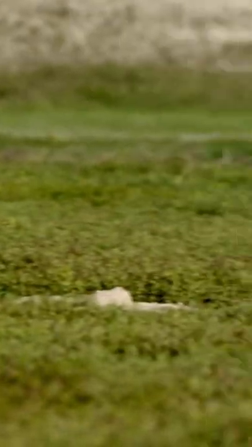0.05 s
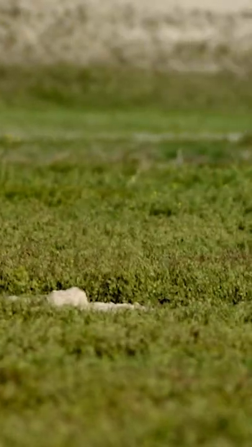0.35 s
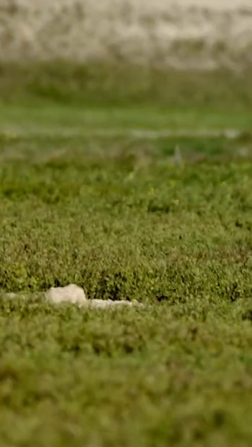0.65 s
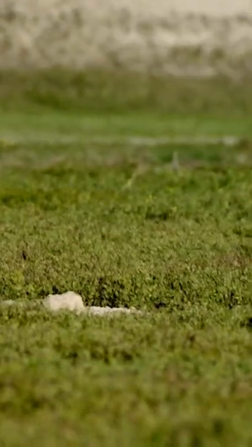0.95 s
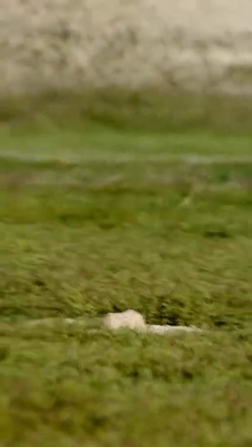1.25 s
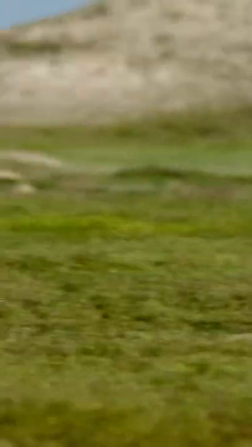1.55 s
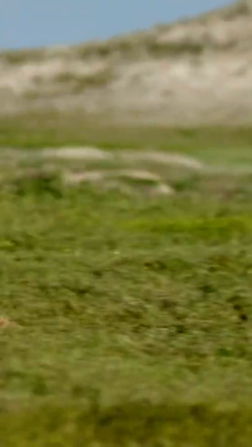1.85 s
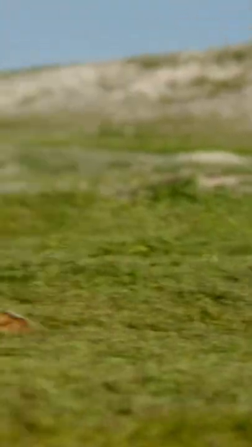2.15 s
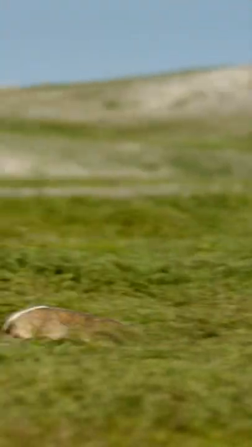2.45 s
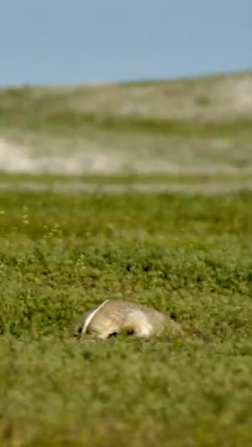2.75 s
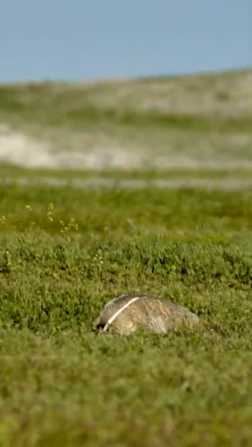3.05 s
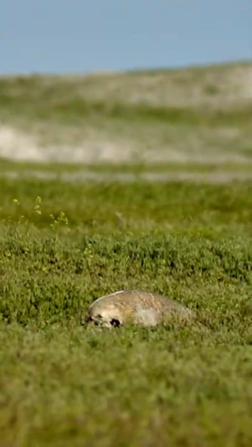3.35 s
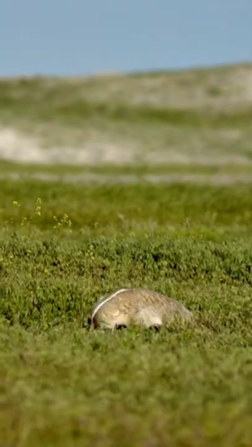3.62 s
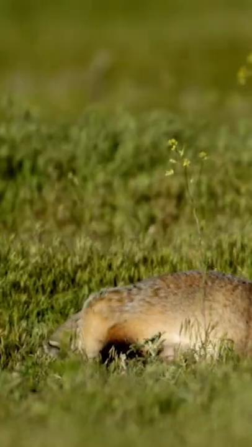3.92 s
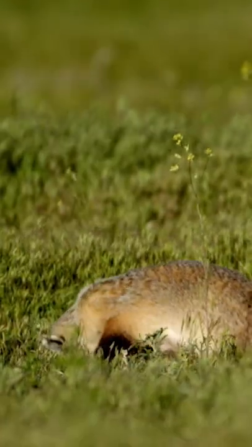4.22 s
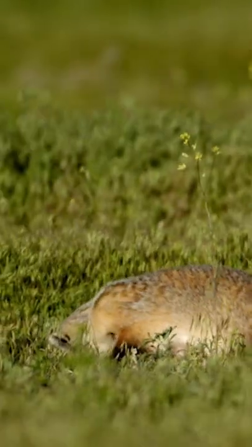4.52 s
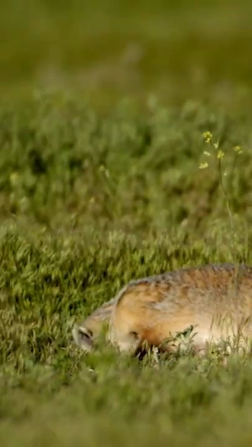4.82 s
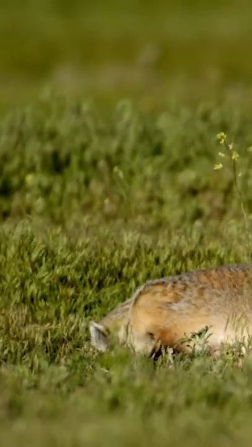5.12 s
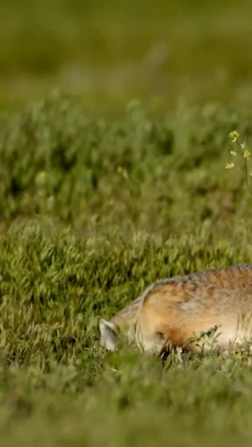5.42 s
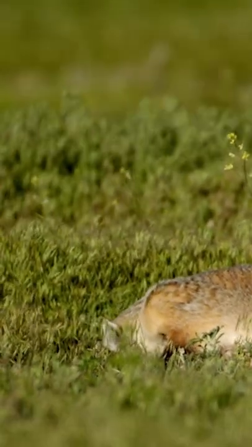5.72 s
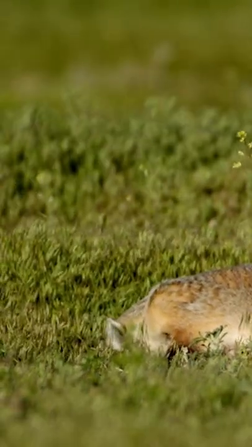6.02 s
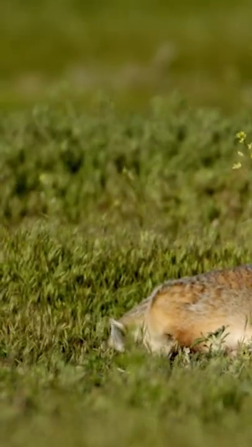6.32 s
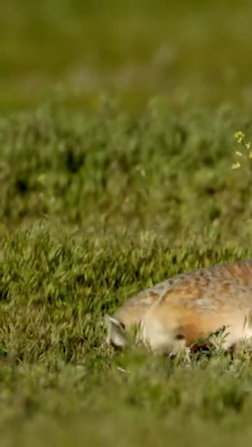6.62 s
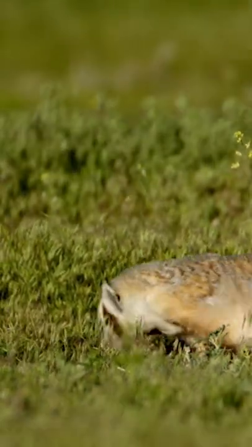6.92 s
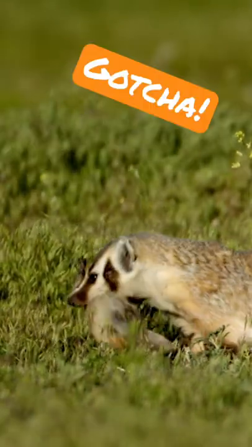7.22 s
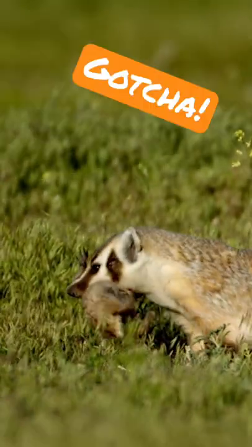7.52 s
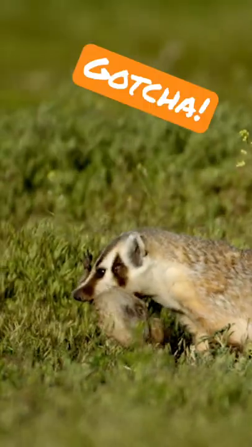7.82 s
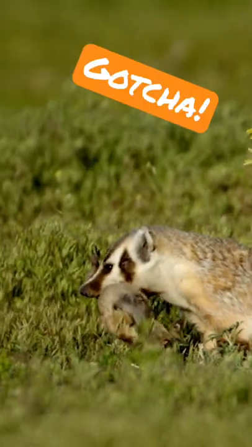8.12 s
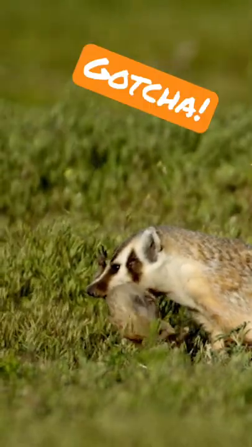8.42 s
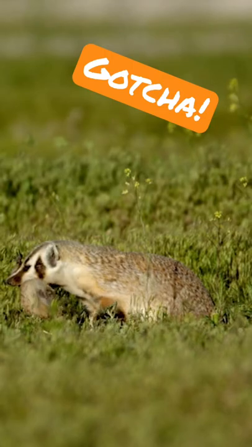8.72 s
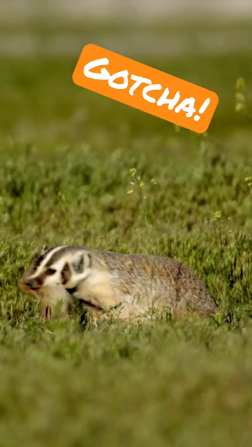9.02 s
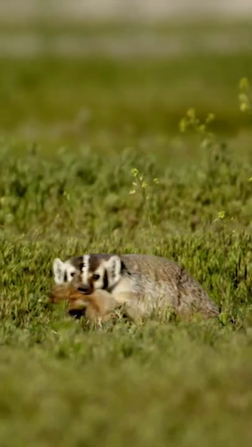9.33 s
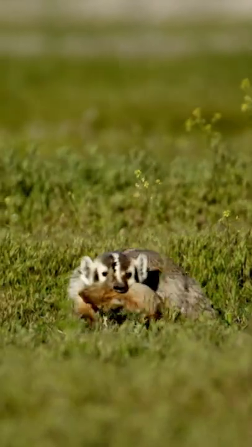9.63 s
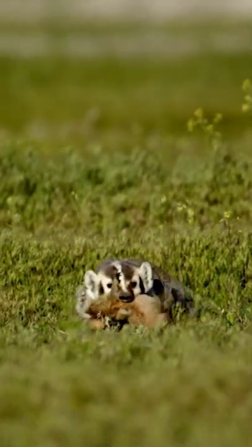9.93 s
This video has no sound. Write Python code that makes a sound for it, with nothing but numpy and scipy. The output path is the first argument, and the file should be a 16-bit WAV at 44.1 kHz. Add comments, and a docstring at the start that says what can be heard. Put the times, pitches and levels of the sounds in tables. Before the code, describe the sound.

Two prairie dogs yip and bark in alarm on breezy open grassland, with distant birdsong, a brief rasp and a few dry clicks.

```python
"""Two prairie dogs call in alarm on open grassland: one with a high, clipped yip that breaks into
roughness, the other with a lower bark that rises and falls. Each voice is a stack of overtones
shaped by a throat. Further off, songbirds whistle and trill in gliding tones; calls and songs echo
faintly off the ground. Close by come a double rasp (tiny slips ringing a hard body), three dry
clicks and a few rustles in the grass. A light wind rumbles and hisses under it all."""
import sys
import numpy as np
from scipy import signal
from scipy.fft import rfft, irfft, next_fast_len
from scipy.io import wavfile
from scipy.ndimage import uniform_filter1d, map_coordinates

SR = 44100
rng = np.random.default_rng(int(sys.argv[2]) if len(sys.argv) > 2 else 0)


def store_wav(level_fs):
    """Save 16-bit WAV to argv[1]."""
    pcm = np.round(np.clip(np.atleast_2d(level_fs), -1, 1) * 32767)
    wavfile.write(sys.argv[1], SR, pcm.T.astype(np.int16))


N = 439236


def amp(db):
    """Turn decibels into a gain."""
    return 10 ** (np.asarray(db) / 20)


def unit(x):
    """Scale a signal to an average (rms) level of 1."""
    return x / np.sqrt(np.mean(x ** 2) + 1e-20)


def along(points, hz):
    """Read between (frequency, value) points on a logarithmic frequency scale."""
    f, v = np.transpose(points)
    return np.interp(np.log(hz + 1), np.log(f + 1), v)


def curves(rows, size=N):
    """Turn each column after the time into a curve with one value per sample."""
    s, *cols = np.transpose(rows)
    return [np.interp(np.arange(size) / SR, s, c) for c in cols]


def wobble(rate, size=N):
    """A smooth curve through `rate` random values a second."""
    return map_coordinates(rng.standard_normal(int(size * rate / SR) + 4), [np.arange(size) * rate / SR])


def filtered(x, response):
    """Give each frequency of x the gain that `response` returns for it."""
    m = next_fast_len(N + 8192)
    return irfft(rfft(x, m) * response(np.fft.rfftfreq(m, 1 / SR)), m)[..., :N]


def ringing(points, size=1024):
    """How a body with this tone colour rings after one sharp tap."""
    cepstrum = irfft(np.log(amp(along(points, np.fft.rfftfreq(size, 1 / SR))) + 1e-6))
    cepstrum[1:size // 2] *= 2
    cepstrum[size // 2 + 1:] = 0  # nothing sounds before the tap
    return irfft(np.exp(rfft(cepstrum)))


def add(out, s, sound, pan_db=0):
    """Mix a sound in at s seconds; a pan above zero is to the left, below zero to the right."""
    part = out[:, max(0, round(s * SR)):][:, :len(sound)]
    ear_gains = amp([[pan_db / 2], [-pan_db / 2]]) / np.sqrt(np.cosh(pan_db * np.log(10) / 10) / 2 + 1 / 2)
    part += ear_gains * sound[:part.shape[1]]


# how wide the wind spreads between the ears: frequency_hz, side_over_middle_db
WIND_WIDTH = [(60, -2), (110, -13), (200, -6.5), (380, 0), (700, 7), (1290, -3), (2380, 0.5), (4400, -3),
              (8120, -1.5), (15000, -8)]


def air(colour, patchy_db):
    """Wide stereo noise with drifting louder and softer patches."""
    noise = signal.stft(rng.standard_normal((2, N)), nperseg=512)[2]
    patches = uniform_filter1d(rng.standard_normal(noise.shape[1:]), size=6, axis=0)
    patches = uniform_filter1d(patches, size=14, axis=1)
    pair = signal.istft(noise * amp(patchy_db * unit(patches)), nperseg=512)[1][:, :N]
    mid, side = filtered(pair, lambda hz: amp([along(colour, hz),
                                               along(colour, hz) + along(WIND_WIDTH, hz)]))
    return np.array([mid + side, mid - side]) / np.std(mid)


# how the wind slowly slackens, before each layer's gain: time_s, rumble_db, rush_db, hiss_db
WIND_LEVELS = [(0.0, -48.5, -53, -50), (0.16, -53.5, -58.5, -56.5), (2.33, -51.5, -54.5, -55),
               (2.86, -53, -55.5, -57), (4.22, -54.5, -57.5, -55), (6.82, -57.5, -59, -56),
               (8.1, -58.5, -62.5, -58.5), (9.96, -59, -62, -54.5)]
# how hard the gusts buffet: time_s, level_db
GUST_LEVELS = [(0, -53), (1.2, -50.5), (1.7, -56), (2.25, -51), (3, -54.5), (6, -54.5), (6.6, -46.5),
               (7.9, -53), (9.96, -53)]
# tone colour of the four wind layers: frequency_hz, gain_db
BUFFET_COLOUR = [(5, -17), (14, 3.5), (28, -5), (50, -20.5), (90, -39), (200, -66)]
RUMBLE_COLOUR = [(25, -20), (55, 0), (110, 0), (160, -1), (300, -2), (420, -3.5), (600, -9.5), (780, -16.5),
                 (1300, -78)]
RUSH_COLOUR = [(350, -35), (600, -4.5), (702, -3.5), (1180, 0), (1880, -3.5), (2200, -7.5), (2860, -25),
               (4840, -120)]
HISS_COLOUR = [(1290, -17.5), (2200, -3), (2590, -1), (3530, -0.5), (3770, -0.5), (3930, -3), (5100, 1),
               (5950, -1.5), (6670, -2.5), (7790, -6), (9560, -7), (13000, -15.5), (14000, -34),
               (15500, -45)]


def wind(rumble_gain_db=1.24, rush_gain_db=0.3, hiss_gain_db=2.5, lean_left_db=2.2):
    """Moving air: lumpy buffeting, a low rumble, a soft rush over the plain and hissing grass."""
    rumble_db, rush_db, hiss_db = curves(WIND_LEVELS)
    gust_db = curves(GUST_LEVELS)[0] + 1.5 * wobble(rate=7)
    buffet = amp(gust_db) * air(BUFFET_COLOUR, patchy_db=1.5)
    rumble = amp(rumble_db + rumble_gain_db + 0.83 * wobble(rate=7)) * air(RUMBLE_COLOUR, patchy_db=0.83)
    rush = amp(rush_db + rush_gain_db) * air(RUSH_COLOUR, patchy_db=0.67)
    hiss = amp(hiss_db + hiss_gain_db) * air(HISS_COLOUR, patchy_db=1.35)
    return (buffet + rumble + rush + hiss) * amp([[lean_left_db / 2], [-lean_left_db / 2]])


# how long the echo takes to fade by 60 dB: frequency_hz, fade_s
ECHO_FADE = [(500, 0.4), (3000, 0.17), (10000, 0.54)]


def ground_echo(sound):
    """Ground and slopes scatter a sound into a blurred tail, different at each ear."""
    hz, t, noise = signal.stft(rng.standard_normal((2, SR // 2)), SR, nperseg=256)
    fade = amp(-60 * t / along(ECHO_FADE, hz)[:, None])
    tail = signal.istft(noise * fade, SR, nperseg=256)[1]
    return signal.fftconvolve(sound, tail / np.linalg.norm(tail[0]), axes=1)[:, :N]


def glide(points_hz, length_s):
    """A smooth pitch path through evenly spaced points."""
    knots = np.linspace(0, 1, len(points_hz))
    return np.polyval(np.polyfit(knots, points_hz, len(knots) - 1), np.linspace(0, 1, int(length_s * SR)))


def whistle(pitch, edge):
    """A pure bird tone; it swells in and fades out, each over the share `edge` of its length."""
    u = np.linspace(0, 1, len(pitch))
    swell = np.sin(np.pi / 2 * np.clip(np.minimum(u, 1 - u) / edge, 0, 1))
    tone = np.sin(2 * np.pi * np.cumsum(pitch) / SR)
    return np.sqrt(2) * swell * amp(1.2 * wobble(91, len(u))) * tone


def far_birds(calls_per_s=1.2, typical_hz=3300, typical_s=0.06, fall=0.05, level_db=-58.5):
    """Faint, slightly falling whistles come at random from all over the plain."""
    out = np.zeros((2, N))
    count = round(calls_per_s * N / SR)
    for k, (late, high, long, side) in enumerate(rng.standard_normal((count, 4))):
        start_s = abs(k + 0.5 + late / 2) / calls_per_s
        hz = typical_hz * np.exp(0.2 * high)
        pitch = glide([hz, hz * (1 - fall)], typical_s * np.exp(0.28 * long))
        add(out, start_s, amp(level_db) * whistle(pitch, edge=0.37), pan_db=3 * side)
    return out


SONGBIRD_PAN_DB = -7.5
# repeated bird notes: first_s, until_s, every_s, length_s, start_hz, middle_hz, end_hz, level_db
TWITTER_NOTES = [(2.647, 2.76, .044, .017, 4050, 4100, 3730, -49.5),
                 (5.478, 6.07, 0.17, 0.035, 7250, 6770, 6270, -49.5),
                 (5.57, 6, .17, .032, 5370, 4750, 4100, -46.5),
                 (6.13, 6.47, 0.22, .078, 3600, 4300, 6000, -51),
                 (6.217, 6.56, .23, .032, 7200, 6100, 5050, -52),
                 (6.535, 6.83, 0.2, .02, 7100, 6200, 5450, -52),
                 (6.558, 6.85, .195, .023, 5700, 6700, 7200, -52)]


def twitter(fade_per_repeat_db=-0.1):
    """A songbird sings quick notes a few times each, weaving high ones between low ones."""
    out = np.zeros((2, N))
    for first_s, until_s, every_s, length_s, *path_hz, level_db in TWITTER_NOTES:
        for repeat, start_s in enumerate(np.arange(first_s, until_s, every_s)):
            note = whistle(glide(path_hz, length_s), edge=0.22)
            add(out, start_s, amp(level_db + fade_per_repeat_db * repeat) * note, SONGBIRD_PAN_DB)
    return out


# single whistles, bowed midway: start_s, length_s, start_hz, end_hz, bow_hz, level_db, pan_db
BIRD_WHISTLES = [(.169, 0.081, 2730, 2590, 0, -53, 0), (0.834, .04, 3010, 2700, 390, -53, -9),
                 (1.129, 0.047, 6000, 5440, 100, -43.5, -9), (1.417, 0.077, 6200, 4780, 296, -43.5, -9.5),
                 (1.55, 0.097, 4700, 4610, -62, -42, -8.5), (1.815, 0.075, 2540, 3740, 110, -40.5, -11),
                 (2.133, 0.034, 2880, 2640, 490, -42.5, -10), (2.18, 0.015, 2720, 3400, 0, -42.5, -8),
                 (2.195, 0.046, 3740, 3890, -80, -37, -9), (2.357, 0.025, 3960, 4200, 220, -40, -10),
                 (2.427, .033, 4370, 4230, 80, -41, -9), (3.553, .11, 4260, 2910, 5, -46, -9),
                 (6.32, .11, 4250, 3950, 50, -52, 9), (6.592, .035, 4370, 4400, 0, -48, 11),
                 (6.7, .12, 4150, 4220, -71, -50, 11), (6.749, .083, 2270, 2220, 0, -56.5, 2),
                 (6.798, 0.1, 4140, 4160, 200, -42, 11), (7.42, .14, 2050, 1550, 0, -61.5, 0),
                 (7.677, 0.092, 3520, 3450, 40, -54, 2), (8.724, .023, 3470, 3300, 180, -50.5, 3)]
# buzzed notes: start_s, length_s, start_hz, end_hz, sweep_hz, sweeps_per_s, level_db
BIRD_BUZZES = [(1.698, 0.076, 3860, 3750, 500, 190, -44), (1.955, .125, 4570, 3636, 480.4, 78, -42.5)]


def songbirds(jitter_hz=130):
    """Birds whistle gliding tones; in two notes the pitch shakes so fast that it buzzes."""
    out = np.zeros((2, N))
    for start_s, length_s, start_hz, end_hz, bow_hz, level_db, pan_db in BIRD_WHISTLES:
        middle_hz = (start_hz + end_hz) / 2 + bow_hz
        pitch = glide([start_hz, middle_hz, end_hz], length_s)
        add(out, start_s, amp(level_db) * whistle(pitch, edge=0.24), pan_db)
    for start_s, length_s, start_hz, end_hz, sweep_hz, sweeps_per_s, level_db in BIRD_BUZZES:
        centre = glide([start_hz, end_hz], length_s)
        sweep = sweep_hz * np.sin(2 * np.pi * sweeps_per_s * np.arange(len(centre)) / SR)
        pitch = centre + sweep + jitter_hz * wobble(900, len(centre))
        add(out, start_s, amp(level_db) * whistle(pitch, edge=0.11), SONGBIRD_PAN_DB)
    return out


# the sparrow's sliding opening notes, ever closer together: start_s
SLIDE_STARTS = [7.137, 7.476, 7.681, 7.84, 7.954, 8.077, 8.179, 8.276, 8.385, 8.46, 8.528, 8.578, 8.618,
                8.656]
# the path through one sliding note and through one trill note: pitch_hz
SLIDE_PITCH = [3950, 4080, 4000, 3910, 3800]
TRILL_PITCH = [4000, 3920, 3840]
# how the song swells and fades: time_s, level_db
SPARROW_LEVELS = [(7.14, -47), (7.5, -53), (8.25, -47), (8.7, -51), (9.93, -57)]


def sparrow(trill_start_s=8.7, trill_end_s=9.93, trill_per_s=28, trill_note_s=0.021, pan_db=11):
    """Sliding notes speed up and shorten like a bouncing ball, then run out in an even, fading trill."""
    out = np.zeros((2, N))
    times_s, levels_db = np.transpose(SPARROW_LEVELS)
    for start_s, gap_s in zip(SLIDE_STARTS, np.diff(SLIDE_STARTS + [trill_start_s])):
        level_db = np.interp(start_s, times_s, levels_db)
        length_s = min(0.5 * gap_s, 0.068)
        add(out, start_s, amp(level_db) * whistle(glide(SLIDE_PITCH, length_s), edge=0.22), pan_db)
    for start_s in np.arange(trill_start_s, trill_end_s, 1 / trill_per_s):
        level_db = np.interp(start_s, times_s, levels_db) + rng.standard_normal()
        add(out, start_s, amp(level_db) * whistle(glide(TRILL_PITCH, trill_note_s), edge=0.76), pan_db)
    return out


# rustles, before the grass colours them: start_s, length_s, level_db
GRASS_RUSTLES = [(0.361, 0.04, -51), (0.531, 0.051, -53), (1.045, .035, -53.5), (1.777, 0.013, -51),
                 (2.033, 0.016, -46), (3.065, 0.033, -55), (4.13, .03, -60), (9.132, 0.049, -55.5)]
# tone colour of the grass: frequency_hz, gain_db
GRASS_COLOUR = [(300, 6), (900, 11), (2000, -2), (4000, 6), (8000, 7.5), (12000, 4), (15000, -18)]


def rustles(crackle_db=4.6):
    """Grass blades crackle in brief clumps: puffs of noise whose level flickers fast."""
    out = np.zeros((2, N))
    for start_s, length_s, level_db in GRASS_RUSTLES:
        size = int(length_s * SR)
        crackle = rng.standard_normal(size) * amp(crackle_db * wobble(1180, size))
        add(out, start_s, amp(level_db) * np.hanning(size) * unit(crackle))
    return filtered(out, lambda hz: amp(along(GRASS_COLOUR, hz)))


# dry clicks, before they are coloured: start_s, level_db, ring_hz, fade_s
DRY_CLICKS = [(4.582, -14.5, 4420, 0.0013), (4.626, -27, 1920, 0.0031), (4.655, -16.5, 2740, 0.0012)]
# tone colour of the clicks: frequency_hz, gain_db
CLICK_COLOUR = [(150, -22), (600, 1.5), (5500, 2), (8000, -5), (12000, -23)]


def clicks(knock_gain=0.26, knock_hz=900, knock_fade_s=0.00079):
    """Each click is a ring that dies within a few cycles, over a duller knock."""
    out = np.zeros((2, N))
    t = np.arange(512) / SR
    for start_s, level_db, ring_hz, fade_s in DRY_CLICKS:
        ring = amp(-60 * t / fade_s) * np.sin(2 * np.pi * ring_hz * t)
        knock = knock_gain * amp(-60 * t / knock_fade_s) * np.sin(2 * np.pi * knock_hz * t)
        add(out, start_s, amp(level_db) * (ring + knock))
    return filtered(out, lambda hz: amp(along(CLICK_COLOUR, hz)))


# the pushes that make up the double rasp: start_s, length_s, level_db, tightness (0 to 1)
RASP_PUSHES = [(2.288, 0.01, -32, 0.3), (2.307, 0.023, -29.5, .8), (2.368, 0.025, -25, 0.54),
               (2.397, 0.017, -30.5, 0), (2.415, 0.016, -27.5, 0)]
# tone colour of the hard body and of the treble it spits: frequency_hz, gain_db
BODY_COLOUR = [(150, -40), (360, -14.5), (700, -17), (1150, -13.5), (1600, -11), (2000, -9.5), (2280, 2),
               (2500, -3.5), (2700, -11), (3050, -6), (3450, -21), (4800, -22.5), (15000, -39.5)]
SPIT_COLOUR = [(2000, -28), (4500, -24), (6600, -12), (7800, 6), (9300, -10), (11300, -1), (15000, -31)]


def rasp(slips_per_s=800, tight_pitch_ratio=1.1, spit_db=-21,
         attack_s=0.002, sag_db_per_s=130, release_db_per_s=1300):
    """Crowded, uneven slips ring a hard body, higher when contact is tight; hard pushes spit treble."""
    t = np.arange(N) / SR
    gaps, sizes = rng.standard_normal((300, 2)).T
    slip_times = RASP_PUSHES[0][0] + np.cumsum(np.exp(0.45 * gaps)) / slips_per_s
    slips = np.bincount((slip_times * SR).astype(int), amp(1.8 * sizes), N)[:N]
    slipping = (t > slip_times[0]) & (t < slip_times[-1])
    # every push bites at once, sags and lets go; the strongest one sets force and tightness
    start_s, length_s, level_db, tightness = np.transpose(RASP_PUSHES)[:, :, None]
    age_s = np.clip(t - start_s, 0, 1)
    fall_db = sag_db_per_s * age_s + release_db_per_s * np.maximum(age_s - length_s, 0)
    pushes = np.minimum(age_s / attack_s, 1) * amp(level_db - fall_db)
    force = pushes.max(axis=0)
    tight = np.clip(tightness.ravel(), 0, 1)[pushes.argmax(axis=0)]
    loose_ring = signal.fftconvolve(slips, ringing(BODY_COLOUR))[:N]
    tight_ring = signal.fftconvolve(slips, ringing(np.array(BODY_COLOUR) * [tight_pitch_ratio, 1]))[:N]
    body = (1 - tight) * loose_ring + tight * tight_ring
    # each slip is a crumbling contact: a burst of noise that is gone within 3 ms
    contact = signal.fftconvolve(slips, amp(-60 * np.arange(256) / SR / 0.003))[:N]
    crumble = signal.fftconvolve(contact * rng.standard_normal(N), ringing(SPIT_COLOUR))[:N]
    spit = amp(spit_db) * np.sqrt(force / force.max()) * crumble / np.std(crumble[slipping])
    return force * (body / np.std(body[slipping]) + spit)


def voice(pitch, rough, bright_db, tilt_db, throat, jitter, doubling, flutter, harmonics=11):
    """Overtones pass through a throat; a rough voice shakes in pitch and level and adds tones between."""
    size = len(pitch)
    phase = 2 * np.pi * np.cumsum(pitch * (1 + jitter * rough * wobble(1502, size))) / SR
    multiple = np.arange(2, 2 * harmonics + 1)[:, None] / 2  # the in-between ones sound only when rough
    hz = multiple * pitch
    treble = np.clip((hz - 4000) / 1500, 0, 1)
    colour_db = along(throat, hz) + tilt_db * np.log2(hz / 3700) + bright_db * treble
    # the upper overtones waver more than the lower ones
    shimmer_db = 2 * np.array([wobble(81, size) for _ in multiple]) * np.clip(multiple / 6, 0, 1)
    strength = amp(colour_db + shimmer_db) * np.where(multiple % 1 == 0, 1, doubling * rough)
    tone = np.sqrt(2) * (strength * np.sin(multiple * phase)).sum(0)
    return tone * (1 + flutter * rough * wobble(908, size))


# the barks, before shape and throat act on them: start_s, pitch_hz, level_db
BARK_CALLS = [(.118, 1046, -37.5), (0.683, 1027, -39), (1.286, 1040, -38.5), (1.904, 1026, -38.5),
              (2.5, 1036, -38.5), (6.62, 1064, -40), (7.194, 1047, -41.5), (7.757, 1037, -42.5),
              (8.357, 1043, -42.5), (8.945, 1019, -43.5), (9.557, 1015, -43)]
# the shape of one bark: time_s, pitch_ratio, gain_db, roughness (0 to 1)
BARK_SHAPE = [(0, 0.53, -11, 1), (.008, 0.77, -0.5, .6), (.022, 0.97, 5, 0.36), (.035, 1, 3, .08),
              (.055, 0.93, 2, 0.2), (.08, .87, -2.5, 0.3), (.098, 0.75, -8.5, 0.4), (.115, 0.65, -19, .2)]
# how the barker's throat colours its voice: frequency_hz, gain_db
BARK_THROAT = [(600, -7.5), (1000, -14.5), (1400, -16), (2050, -27.5), (2600, -11.5), (3100, -6),
               (4000, -11), (4600, -15), (5200, -25), (6200, -21.5), (7200, -31.5), (8500, -24.5),
               (12000, -44)]


def barking_prairie_dog(brightening=0.3):
    """Each bark scoops up from a hoarse start, clears and slides down; louder ones are brighter."""
    out = np.zeros((2, N))
    bend, shape_db, roughness = curves(BARK_SHAPE, int(BARK_SHAPE[-1][0] * SR))
    roughness = np.clip(roughness, 0.17, 1)  # never fully clear
    average_db = np.mean(BARK_CALLS, axis=0)[2]
    for start_s, pitch_hz, level_db in BARK_CALLS:
        pitch = pitch_hz * bend * (1 + 0.008 * wobble(45, len(bend)))
        bright_db = brightening * (level_db - average_db)
        bark = voice(pitch, roughness, bright_db, tilt_db=0, throat=BARK_THROAT,
                     jitter=0.07, doubling=0.4, flutter=0.25)
        add(out, start_s, amp(level_db + shape_db + wobble(70, len(bend))) * bark)
    return out


# the yips, before shape and throat act on them:
# start_s, pitch_hz, level_db, pan_db, force (0 to 1), tilt_db_per_octave
YIP_CALLS = [(.508, 1297, -36, 1.5, 1, -7.5), (0.921, 1190, -36.5, 9, 0, -4),
             (1.32, 1171, -34, 17.5, 0.28, -3), (1.69, 1236, -33.5, 13, 0.06, -3),
             (2.045, 1215, -33.5, 13.5, 0.46, -4), (2.463, 1255, -31.5, 13, 0.3, -4),
             (2.866, 1150, -34, 12, 0.48, -0.5), (3.237, 1184, -34, 11.5, 0, 4),
             (4.039, 1255, -35.5, 6.5, 0.55, 1.5), (4.689, 1360, -35.5, 6, 1, 0),
             (5.071, 1334, -37.5, 1.5, 1, -1.5), (5.427, 1264, -37, 1, 0.38, 1),
             (5.945, 1244, -41, 2, 0, 3), (6.287, 1310, -38.5, 1, 0.68, 0), (6.616, 1261, -40, 0, 0.6, 0),
             (6.944, 1265, -40, 0.5, 0.67, 0.5), (7.276, 1218, -41, 0, 0.47, 2),
             (7.589, 1206, -42.5, 0, 0.38, 3), (7.974, 1247, -41.5, 1, 0.68, 0.5),
             (8.333, 1220, -42, 1, 0.58, 2), (8.992, 1327, -39, 0, 0.97, -1), (9.359, 1210, -42, 0, 0, 4),
             (9.736, 1173, -43, 0, 0.76, 1.5)]
# the shape of one yip, before force acts on it: time_s, pitch_ratio, gain_db, roughness, treble_db
YIP_SHAPE = [(0, 0.992, -12, 0.22, -4), (.003, .975, 1, 0.19, -4), (.015, 1, 2.5, .2, -5),
             (.027, 1.005, 1.5, 1.1, 1), (.036, .99, -2.5, 1, 2.5), (.044, .92, -3, 0.89, 1.5),
             (.052, .82, -12, .5, -4)]
# how the yipper's throat colours its voice: frequency_hz, gain_db
YIP_THROAT = [(1200, -38), (2000, -34), (2350, -14), (2650, -10), (3100, -7.5), (3600, 0.5), (4100, -9),
              (4700, -20.5), (5400, -15.5), (6000, -11.5), (6900, -19.5), (7700, -35), (12000, -60)]


def yipping_prairie_dog(soft_treble_db=-0.5, forced_treble_db=6.5, soft_droop=0.596, forced_droop=0.5825):
    """Yips start nearly clean; forced ones overshoot in pitch, turn rough and bright and droop more."""
    out = np.zeros((2, N))
    bend, shape_db, roughness, treble_db = curves(YIP_SHAPE, int(YIP_SHAPE[-1][0] * SR))
    t = np.arange(len(bend)) / SR
    overshoot = 0.0527 * np.exp(-((t - 0.011) / 0.0076) ** 2)  # a pitch bump 11 ms into the yip
    for start_s, pitch_hz, level_db, pan_db, force, tilt_db in YIP_CALLS:
        droop = soft_droop + forced_droop * force
        pitch = pitch_hz * bend ** droop * (1 + force * overshoot)
        bright_db = treble_db + soft_treble_db + forced_treble_db * force
        yip = voice(pitch, force * roughness, bright_db, tilt_db, YIP_THROAT,
                    jitter=0.056, doubling=0.7, flutter=0.17)
        add(out, start_s, amp(level_db + shape_db) * yip, pan_db)
    return out


def scene():
    """Mix the prairie dogs and birds, their faint echo, the nearby noises and the wind."""
    dogs = yipping_prairie_dog() + barking_prairie_dog()
    birds = songbirds() + twitter() + sparrow() + far_birds()
    echo = ground_echo(amp(-18) * dogs + amp(-9.5) * birds)
    return dogs + birds + echo + rasp() + clicks() + rustles() + wind()


def record(dry):
    """Cut away the very highest treble, from 14900 Hz up."""
    return filtered(dry, lambda hz: hz < 14900)


dry = scene()
out = record(dry)
store_wav(out)
```